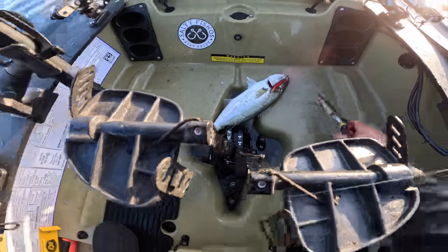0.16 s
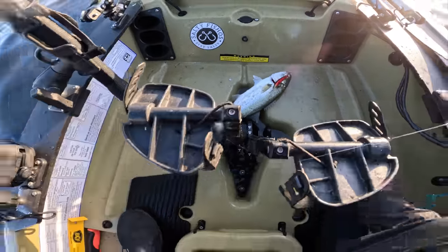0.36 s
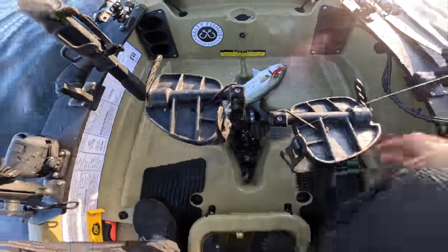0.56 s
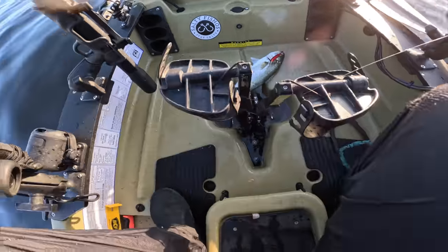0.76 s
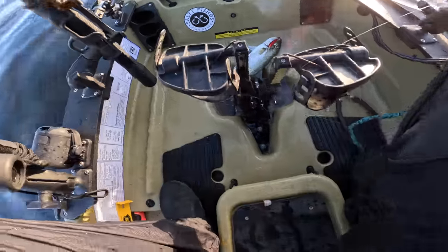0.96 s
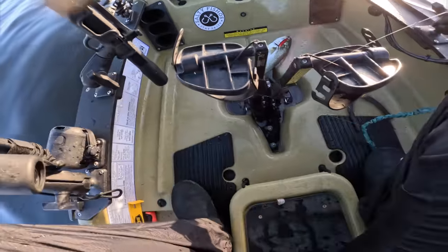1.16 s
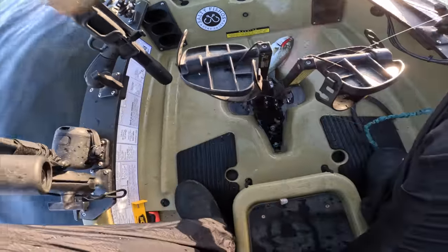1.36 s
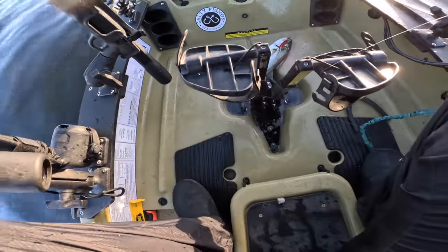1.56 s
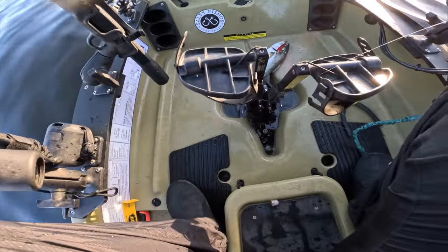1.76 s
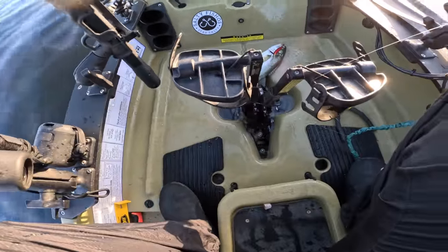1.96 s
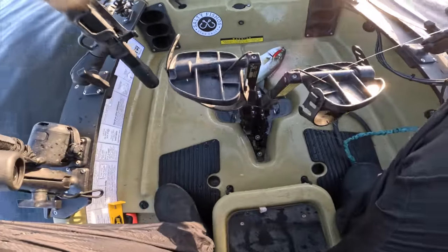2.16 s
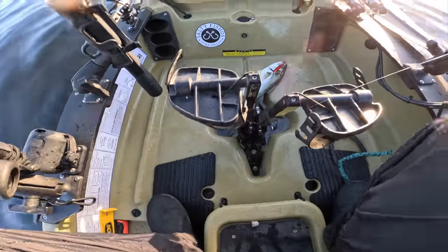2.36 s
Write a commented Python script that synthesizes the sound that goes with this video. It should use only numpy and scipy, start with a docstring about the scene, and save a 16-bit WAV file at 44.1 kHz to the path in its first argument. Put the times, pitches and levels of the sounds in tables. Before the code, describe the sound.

A fish flops on a hollow plastic kayak deck close by, first at 0.2 seconds with a small metal clink. From about 0.45 to 0.75 seconds it thrashes in rapid, booming thumps with wet smacks and light rustling. Then gear knocks and ticks lightly, most clearly near 1 second. Faint water, hiss, a soft whirr and a distant motor hum lie underneath. Wind rumble on the microphone rises from 1.8 seconds.

```python
"""On the deck of a hollow plastic kayak, a freshly caught fish lies an arm's length from the microphone.
Faint water, a soft whirr, wind on the microphone and a far motor's hum are there from the start.
At 0.2 s the fish flops once with a clink of metal, then thrashes in a fast run of tail beats: each blow
booms in the hull, rings the deck panel and smacks wetly. From 0.8 s the fish is still, gear knocks and
ticks lightly and a hiss comes and goes; towards the end the wind rises."""
import sys
import numpy as np
from scipy import signal
from scipy.io import wavfile

SR = 44100
rng = np.random.default_rng(int(sys.argv[2]) if len(sys.argv) > 2 else 0)


def to_wav(s):
    """Save 16-bit WAV."""
    ch = np.atleast_2d(s).T  # columns
    pcm = np.round(np.clip(ch, -1, 1) * 32767)  # PCM
    wavfile.write(sys.argv[1], SR, pcm.astype(np.int16))


N = 110250
T = np.arange(N) / SR


def from_db(db):
    """Decibels to gain."""
    return 10 ** (np.asarray(db) / 20)


def rms_one(x):
    """Scale to unit rms."""
    return x / np.sqrt(np.mean(x ** 2) + 1e-20)


def lean(db):
    """Left and right gains that put the left this many dB above the right."""
    return from_db(np.array([[db], [-db]]) / 2)


def butter(x, order, hz, kind):
    """Butterworth filter."""
    return signal.sosfilt(signal.butter(order, hz, kind, fs=SR, output="sos"), x)


def in_time(rows):
    """The columns of a curve at every sample."""
    times, *columns = np.transpose(rows)
    return [np.interp(T, times, column) for column in columns]


def at_hz(points, hz):
    """Read a table on a log-frequency axis."""
    freqs, values = np.transpose(points)
    return np.interp(np.log(hz), np.log(freqs), values)


def drift(rate):
    """Slow random wander of spread 1."""
    pole = np.exp(-80 * np.pi * rate / SR)
    slow = signal.lfilter([1], [1, -2 * pole, pole * pole], rng.standard_normal(N // 40 + 2002))[2000:]
    return np.interp(np.arange(N) / 40, np.arange(len(slow)), rms_one(slow))


def clicks(times, levels_db):
    """One impulse per event."""
    out = np.zeros(N)
    np.add.at(out, (np.asarray(times) * SR).astype(int), from_db(levels_db))
    return out


def dying(impulses, t60):
    """Envelope of bursts that add in power and die away."""
    return np.sqrt(signal.lfilter([1], [1, -from_db(-120 / (t60 * SR))], impulses ** 2 + 1e-18))


def ring(impulses, hz, t60):
    """A unit click sets a sine of height 1 ringing."""
    r, w = from_db(-60 / (t60 * SR)), 2 * np.pi * hz / SR
    return signal.lfilter([0, np.sin(w)], [1, -2 * r * np.cos(w), r * r], impulses + 1e-18)


def body(impulses, modes):
    """All modes of an object struck together, alternating in sign, their strengths summing to 1."""
    rings = sum((-1) ** k * from_db(db) * ring(impulses, hz, t60)
                for k, (hz, db, t60) in enumerate(modes))
    return rings / sum(from_db(db) for _, db, _ in modes)


# Stereo width of noise at the microphone. Each row: frequency in Hz, side against mid in dB.
STEREO_WIDTH = [(25, -4), (80, -61), (300, -28.5), (1000, -16), (4000, -15), (8000, -9.5), (13000, 0)]
def noise_bands(spectrum):
    """Centres in Hz and bands of stereo noise that together have rms 1."""
    edges = np.geomspace(18, 17000, 25)
    centres = np.sqrt(edges[1:] * edges[:-1])
    white, bands = rng.standard_normal((2, 2, N)), []
    for k, hz in enumerate(centres):
        mid, side = butter(white[k % 2], 2, edges[k:k + 2], "band")
        stereo = mid + from_db(at_hz(STEREO_WIDTH, hz)) * side * [[1], [-1]]
        bands.append(from_db(at_hz(spectrum, hz)) * stereo)
    return centres, np.array(bands) / np.std(sum(bands))


# Balance of the background. Each row: frequency in Hz, left minus right in dB.
TREBLE_LEAN = [(6000, 0.5), (9000, 1), (13000, 6.5)]
def wash(spectrum, flicker_db):
    """Steady noise whose bands flicker a little; its top leans left."""
    return sum(band * from_db(flicker_db * drift(9.7)) * lean(at_hz(TREBLE_LEAN, hz))
               for hz, band in zip(*noise_bands(spectrum)))


# A motor far off. Each row: time in seconds, pitch in Hz, level in dB.
MOTOR_COURSE = [(0, 176.2, -40.5), (.9, 174, -46.5), (1.48, 172.6, -41.5), (1.69, 169.9, -38.5),
                (1.8, 168.8, -40.5), (2.4, 166.4, -40.5), (2.5, 172.7, -45)]
# Its partials. Each row: multiple of the pitch, relative level in dB.
HUM_PARTIALS = [(.565, -3), (1, -1.5), (2, -20.5)]
def motor(waver_db=3.5):
    """The far motor's wavering hum sinks slowly in pitch and lifts at the very end."""
    hz, db = in_time(MOTOR_COURSE)
    turns = np.cumsum(hz * (1 + 0.0046 * drift(7.1))) / SR
    return sum(from_db(db + partial_db + waver_db * drift(14.8))
               * np.sqrt(2) * np.sin(2 * np.pi * (multiple * turns + rng.random()))
               for multiple, partial_db in HUM_PARTIALS)


# Water around the kayak. Each row: frequency in Hz, relative density in dB.
WATER_SPECTRUM = [(60, -3), (130, 0), (200, -5), (260, -10.5), (340, -10), (470, -29), (750, -23.5),
                  (880, -21.5), (1020, -33), (1400, -39), (2500, -70.5), (7000, -50.5), (9000, -65),
                  (15000, -75)]
def water(level_db=-42.5):
    """Open water washes low and steady."""
    return from_db(level_db) * wash(WATER_SPECTRUM, flicker_db=-2.5)


# Hiss in the background. Each row: frequency in Hz, relative density in dB.
HISS_SPECTRUM = [(300, 5), (900, 3.5), (1800, -1.5), (3000, -3.5), (4500, -10), (7000, -10.5), (10000, -29),
                 (13000, -22.5), (16000, -28)]
# Its swells. Each row: time in seconds, level in dB.
HISS_SWELLS = [(0, -74), (.28, -52.5), (.5, -72.5), (.82, -52.5), (.97, -61.5), (1.22, -48.5),
               (1.43, -66.5), (1.56, -56.5), (1.68, -60.5), (1.78, -58.5), (1.9, -71.5), (2.32, -65),
               (2.46, -50)]
def hiss():
    """A broad hiss comes and goes."""
    return from_db(in_time(HISS_SWELLS)[0]) * wash(HISS_SPECTRUM, flicker_db=3.0)


# Whirr in the background. Each row: frequency in Hz, relative density in dB.
WHIRR_SPECTRUM = [(350, -39.5), (550, -9), (700, 7), (850, -11.5), (1100, -6), (1800, -56)]
# Its course. Each row: time in seconds, level in dB.
WHIRR_COURSE = [(0, -48.5), (.4, -50.5), (.7, -47), (.85, -62), (1.8, -56), (2.5, -55.5)]
def whirr(core_db=-1):
    """A soft midrange noise with a narrow, almost pitched core."""
    core = from_db(core_db) * rms_one(ring(rng.standard_normal(N), hz=723.5, t60=.04))
    return from_db(in_time(WHIRR_COURSE)[0]) * (wash(WHIRR_SPECTRUM, flicker_db=2.4) + core)


# Wind right on the microphone. Each row: frequency in Hz, relative density in dB.
WIND_SPECTRUM = [(20, 12.5), (35, 18.5), (60, 13), (100, 5), (200, 0), (500, -57)]
# Its gusts. Each row: time in seconds, level in dB.
WIND_GUSTS = [(0, -38), (.7, -50), (.85, -73), (1.8, -36.5), (2.15, -35), (2.5, -29)]
def wind():
    """Air rumbles on the microphone, a little more on the right."""
    return from_db(in_time(WIND_GUSTS)[0]) * wash(WIND_SPECTRUM, flicker_db=0.5) * lean(db=-3)


# Rustle close by. Each row: frequency in Hz, relative density in dB.
RUSTLE_SPECTRUM = [(400, -2), (900, 3.5), (1800, 1), (3000, 0), (4500, -8.5), (7000, -16), (10000, -28),
                   (15000, -45)]
# Its swells. Each row: time in seconds, level in dB.
RUSTLE_SWELLS = [(0, -61), (.05, -56.5), (.14, -61.5), (.26, -48), (.35, -48), (.41, -56), (.455, -48.5),
                 (.56, -57.5), (.62, -47.5), (.7, -48), (.82, -57.5), (.95, -79)]
def rustle():
    """A light rustle surrounds the thrashing and fades after it."""
    return from_db(in_time(RUSTLE_SWELLS)[0]) * wash(RUSTLE_SPECTRUM, flicker_db=2.5)


# Gear on the hull. Each row: start in seconds, relative levels of knock and low ring in dB.
GEAR_KNOCKS = [(0.845, -49, -29), (0.887, -44, -57), (1.0523, -19.5, -24), (1.1064, -34.5, -56),
               (1.207, -33.5, -54), (1.288, -39.5, -49), (1.5087, -38.5, -23.5), (1.610, -41.5, -42),
               (1.779, -39, -82), (1.833, -40, -55)]
# Modes of the knock and of the low ring. Each row: pitch in Hz, relative level in dB, t60 in seconds.
KNOCK_MODES = [(695, -16, 0.004), (990, 12.5, 0.011), (1760, 5, 0.0096), (2920, -1, 0.0081)]
LOW_RING_MODES = [(347, 16.5, 0.018), (560, -11, .025)]
def gear_knocks(gain_db=5.5):
    """Gear bumps the plastic: a dull knock over a hollow low ring."""
    starts, knock_db, low_db = np.transpose(GEAR_KNOCKS)
    knocks = butter(body(clicks(starts, knock_db), KNOCK_MODES), 2, [400, 3000], "band")
    return from_db(gain_db) * knocks + body(clicks(starts, low_db), LOW_RING_MODES)


# Tackle on board. Each row: start in seconds, level in dB.
TACKLE_TAPS = [(0.04, -46.5), (0.081, -48), (0.829, -42), (0.845, -49.5), (2.1833, -38.5), (2.315, -41.5)]
# The noise of a tick. Each row: frequency in Hz, relative density in dB.
TICK_SPECTRUM = [(600, 11.5), (1800, 14), (2800, 2), (3700, 10.5), (4700, -18), (6800, -1.5), (9000, -28),
                 (15000, -34)]
# Its ring. Each row: pitch in Hz, relative level in dB, t60 in seconds.
TICK_MODES = [(1724, -0.5, 0.023), (2660, 0, 0.039), (3620, -1, 0.051), (3930, -7.5, 0.026),
              (5740, -8, 0.036), (7340, -9, 0.027)]
def tackle_ticks(ring_db=4):
    """Tackle taps sharply: a burst of noise and a short bright ring."""
    taps = clicks(*np.transpose(TACKLE_TAPS))
    _, bands = noise_bands(TICK_SPECTRUM)
    return bands.sum(axis=0) * dying(taps, t60=0.032) + from_db(ring_db) * body(taps, TICK_MODES)


# Metal touching as the fish first moves. Each row: start in seconds, level in dB.
METAL_TAPS = [(0.213, -34.5), (0.2186, -25)]
# The metal's modes. Each row: pitch in Hz, relative level in dB, t60 in seconds.
METAL_MODES = [(2970, 4.5, 0.041), (3353, -8, 0.049), (3160, -7, 0.02)]
def metal_clink():
    """A small piece of metal rings from two quick taps."""
    return body(clicks(*np.transpose(METAL_TAPS)), METAL_MODES)


# The hollow hull below the microphone. Each row: pitch in Hz, relative level in dB, t60 in seconds.
HULL_MODES = [(77.3, -19, 0.74), (94, -1, 0.13), (129, 3, 0.095), (167, -18.5, .35), (187.57, -10.5, 0.54),
              (217, -1, 0.29), (248.3, -1.5, 0.22), (247.7, 6.5, 0.12), (287.7, -1.5, 0.19),
              (320.7, -2, 0.12), (360, -43.5, 0.1)]
def hull_thumps(starts, levels_db, contact_hz=425, gain_db=5):
    """The fish's weight lands softly and booms in the hull, which radiates little deep bass."""
    push = butter(clicks(starts, levels_db) + 1e-18, 4, contact_hz, "low")
    return from_db(gain_db) * butter(body(push, HULL_MODES), 2, 84.8, "high")


def deck_thuds(starts, levels_db, lag_s=0.00467, gain_db=1.5):
    """The deck dips and springs back under each blow."""
    return -ring(clicks(starts + lag_s, levels_db + gain_db), hz=216, t60=0.0089)


# The deck panel under the fish. Each row: pitch in Hz, relative level in dB, t60 in seconds.
PANEL_MODES = [(384, -4.5, 0.3), (442, -6, 0.26), (507, 1, 0.11), (571, -4, 0.1), (643, 4, 0.053),
               (736, -1, .09), (967, -6, 0.15), (1073, 1, 0.029), (1205, -9.5, 0.081), (1303, -10, .07),
               (1351, -5.5, 0.14), (1426, -8, 0.15), (1746, -6, 0.048), (1957, -17, 0.079),
               (2340, -12, 0.074), (2574, -9, 0.013), (3660, -21.5, 0.038)]
def panel_rings(starts, levels_db, spot_hz, spot_db=11, spot_octaves=0.13, lag_s=.004, gain_db=-17):
    """Each blow rings the deck panel, favouring the modes near the pitch of the spot it hits."""
    scatter_db = 4.5 * rng.standard_normal((len(starts), len(PANEL_MODES)))
    out = 0
    for k, (hz, mode_db, t60) in enumerate(PANEL_MODES):
        favour_db = spot_db * np.exp(-(np.log2(hz / spot_hz) / spot_octaves) ** 2)
        strikes = clicks(starts + lag_s, levels_db + mode_db + favour_db + scatter_db[:, k])
        out = out + (-1) ** (k // 4) * ring(strikes, hz, t60)
    return from_db(gain_db) * out


# Wet skin on plastic, heard close. Each row: frequency in Hz, relative density in dB.
SMACK_SPECTRUM = [(200, -1), (450, -1.5), (900, 6.5), (1600, 0.5), (3200, -9), (4500, -14), (6500, -40),
                  (9000, -38), (15000, -56.5)]
# Its decay. Each row: frequency in Hz, t60 in seconds.
SMACK_DECAY = [(200, 0.06), (1000, 0.017), (3000, 0.043), (12000, 0.0093)]
def wet_smacks(starts, levels_db, lag_s=0.0045, rise_s=.0014, rattle_db=-22):
    """Wet skin flattens on the deck just after the first touch; loose gear shivers faintly after it."""
    hits = clicks(starts + lag_s, levels_db)
    rattle = from_db(rattle_db) * dying(hits, t60=0.11)
    pole = np.exp(-1 / (rise_s * SR))
    return sum(band * signal.lfilter([1 - pole], [1, -pole], dying(hits, at_hz(SMACK_DECAY, hz)) + rattle)
               for hz, band in zip(*noise_bands(SMACK_SPECTRUM)))


# The fish's blows, an arm's length away. Each row: start in seconds, relative levels of hull thump,
# panel ring and wet smack in dB, pitch that the struck spot favours in Hz.
FISH_BLOWS = [(0.2185, -3.5, -10, -28, 1350), (0.2337, -11, -14, -37, 1350), (0.4578, 1.5, -11, -19, 1750),
              (0.4905, -12, -19, -28.5, 540), (0.5071, -3.5, -24.5, -40.5, 550),
              (0.5331, -4, -26, -47, 1510), (0.5465, -6, -32.5, -35.5, 600), (0.5623, -16, -35, -45, 1500),
              (0.5823, -6, -30, -66, 600), (0.601, -9, -40.5, -53, 600), (0.6298, -10, -8, -13.5, 1040),
              (0.6446, -3.5, -27, -38, 750), (0.657, 3.5, -17.5, -23, 1220), (0.6742, -1, -27, -50, 600),
              (0.6876, -14.5, -26.5, -36.5, 600), (0.6934, -5, -31.5, -50, 600),
              (0.7099, -3.5, -61, -52.5, 1000), (0.7188, -11, -25, -40, 1100), (0.733, -6.5, -39, -47, 600),
              (0.7484, -18.5, -33, -54, 1100)]
def thrashing_fish(port_lag_s=.00002):
    """The fish beats the deck, whose sound reaches the right microphone port slightly later."""
    starts, hull_db, panel_db, smack_db, spot_hz = np.transpose(FISH_BLOWS)
    left = hull_thumps(starts, hull_db) + deck_thuds(starts, panel_db)
    left += panel_rings(starts, panel_db, spot_hz)
    right = np.interp(T - port_lag_s, T, left)
    return np.array([left, right]) + wet_smacks(starts, smack_db)


def scene():
    """The fish almost straight ahead of the microphone, gear nearby, open water all around."""
    on_board = thrashing_fish() + gear_knocks() + tackle_ticks() + metal_clink()
    return on_board + motor() + water() + wind() + hiss() + rustle() + whirr()


def record(dry):
    """Peaks stop at full scale and the top is cut above 15.7 kHz."""
    lowpass = signal.ellip(10, .1, 80, 15700, fs=SR, output="sos")
    return signal.sosfilt(lowpass, np.clip(dry, -1, 1))


dry = scene()
out = record(dry)
to_wav(out)
```